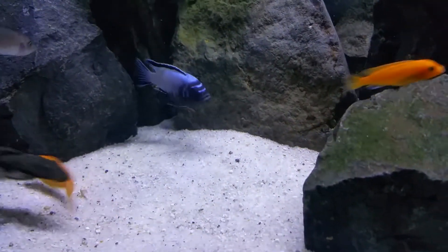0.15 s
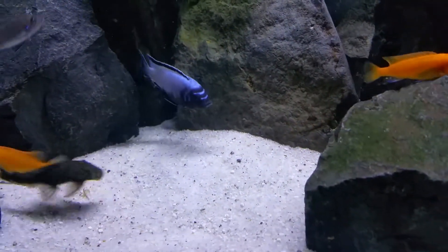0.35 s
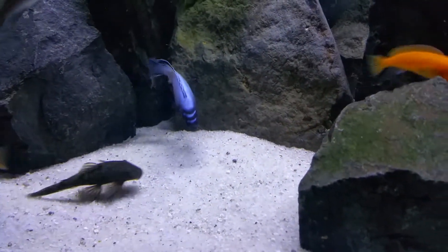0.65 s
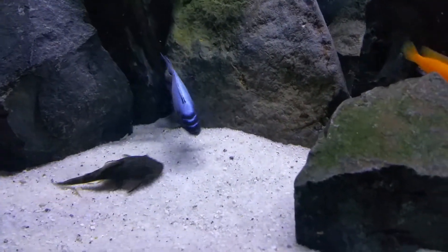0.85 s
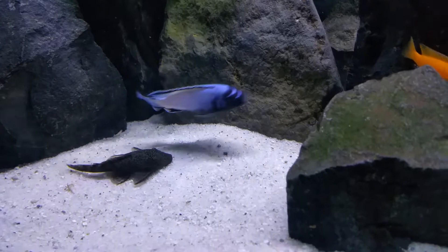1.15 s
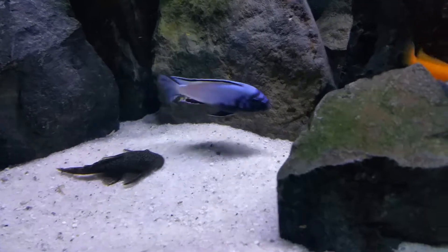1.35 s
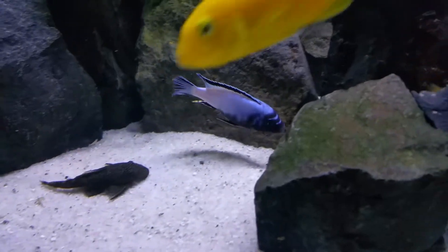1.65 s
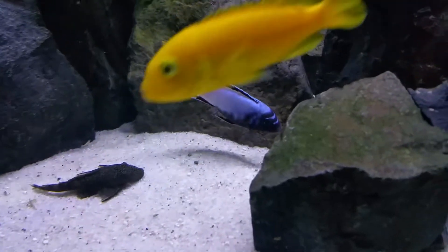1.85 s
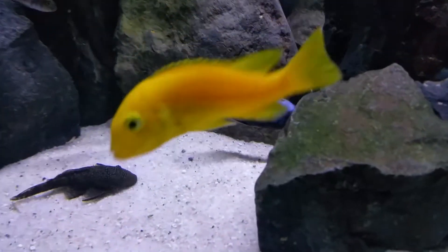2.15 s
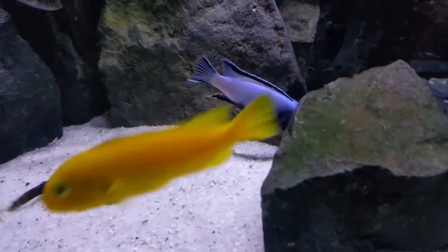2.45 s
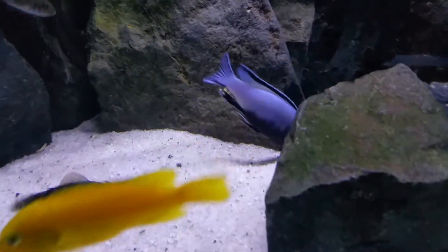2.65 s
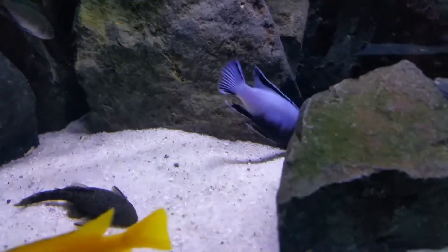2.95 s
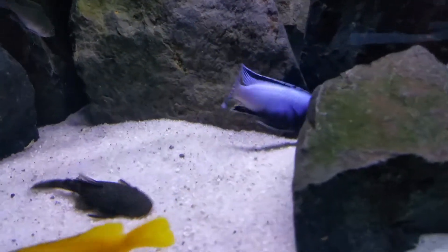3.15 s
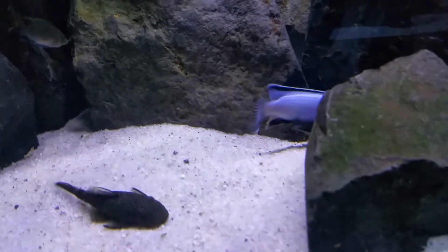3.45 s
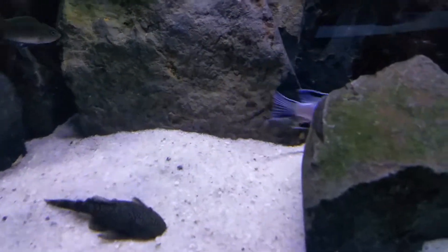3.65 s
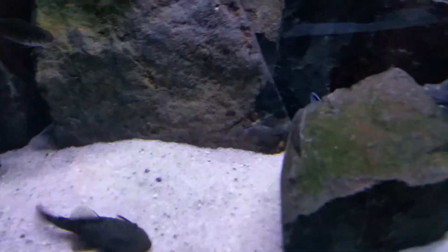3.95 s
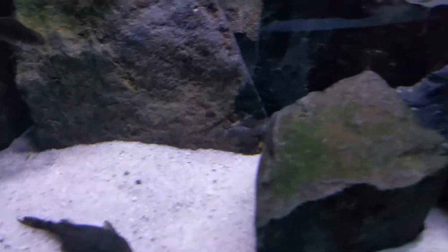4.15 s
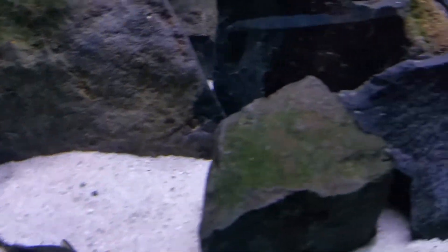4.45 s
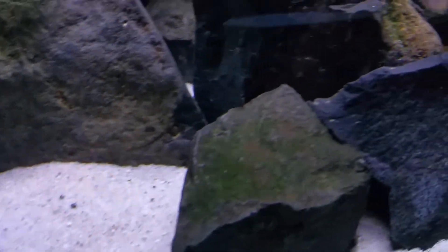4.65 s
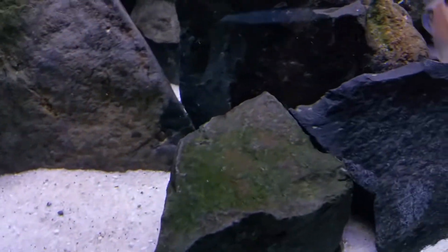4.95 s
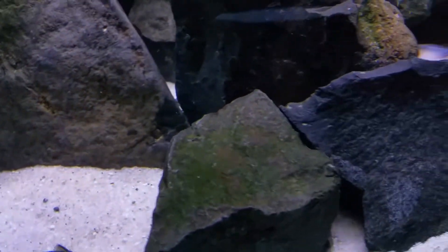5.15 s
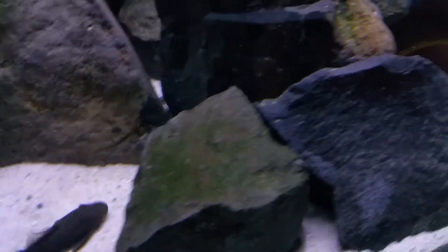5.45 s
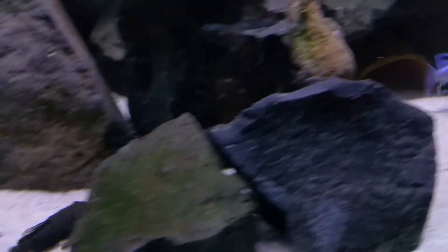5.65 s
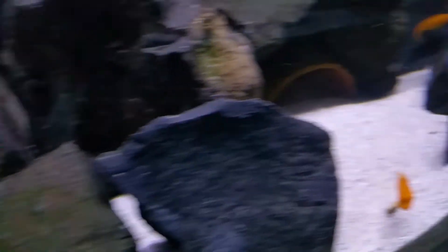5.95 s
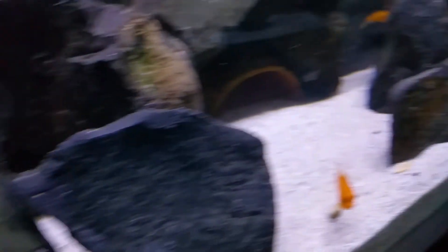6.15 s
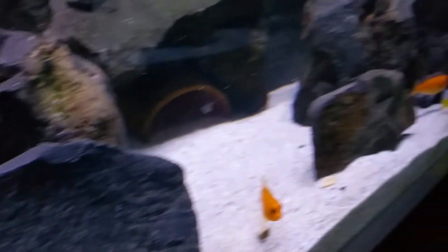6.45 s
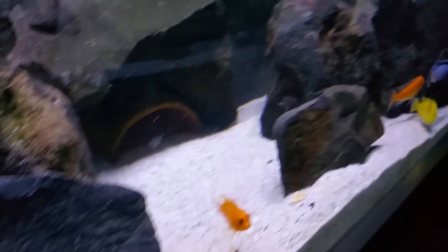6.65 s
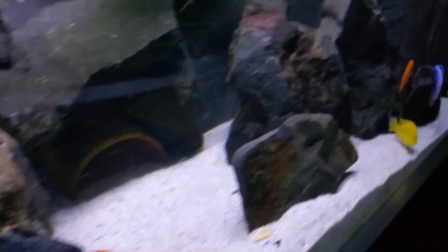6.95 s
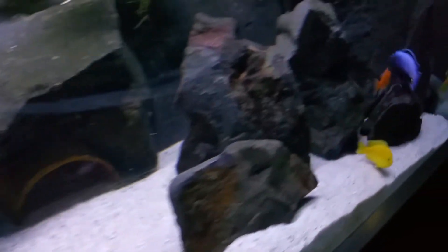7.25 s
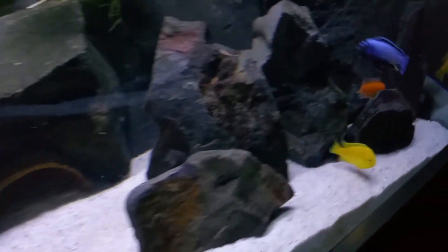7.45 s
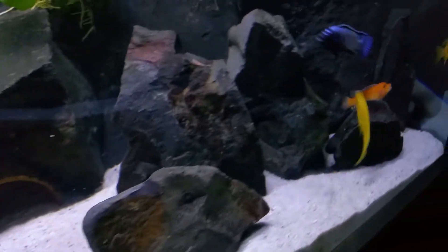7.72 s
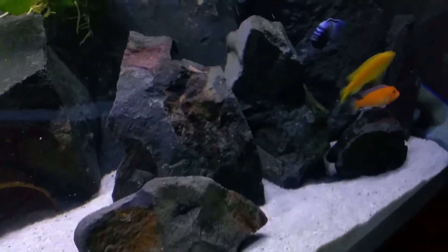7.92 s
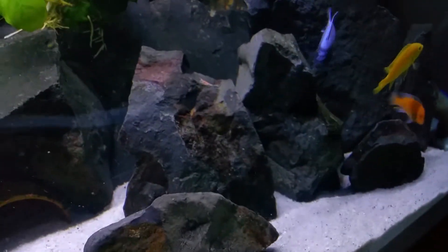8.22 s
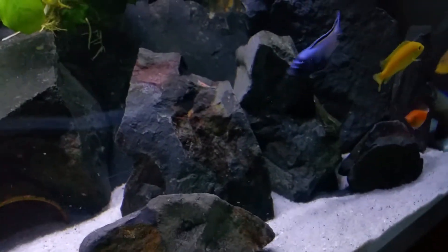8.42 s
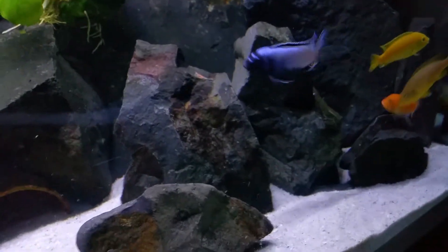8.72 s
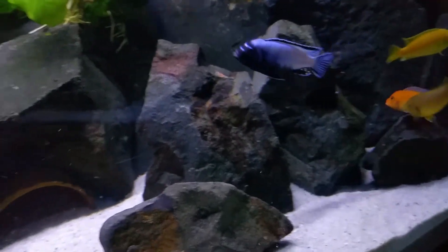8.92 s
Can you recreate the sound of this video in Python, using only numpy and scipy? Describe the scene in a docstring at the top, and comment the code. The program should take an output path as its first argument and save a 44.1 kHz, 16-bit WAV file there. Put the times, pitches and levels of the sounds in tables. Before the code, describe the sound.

An aquarium pump hums low and steady over a soft wash of water and air, with a faint fluttering whine. A quick double pop opens on the left; a stronger pair comes about two seconds in, among dry plastic ticks. More faint ticks follow around six seconds. Heard by a hand-held stereo microphone in a quiet room, with hiss, barely audible high pips and slight handling rumble at the end.

```python
"""Throughout, aquarium pumps hum on the orders of the mains and whine over a wash of water and air, and
standing waves swell and fade as a hand-held camera drifts through them. At the very start the left
microphone pops twice, and thin electronic pips set in about once a second, mostly in pairs. From 1.7 s
the plastic housing ticks as damped modes; at 2.1 s a second, stronger pair of pops steps the left
pressure. The ticks end near 6.5 s, and the rumble of the hand is strongest at the close."""
import sys
import numpy as np
from scipy import signal
from scipy.io import wavfile
from scipy.ndimage import uniform_filter1d

SR = 44100
rng = np.random.default_rng(int(sys.argv[2]) if len(sys.argv) > 2 else 0)


def dump(signal):
    """Clip the signal to [-1, 1] and save it as 16-bit WAV at the path in sys.argv[1]."""
    limited = np.clip(np.atleast_2d(signal).T, -1, 1)
    pcm = np.round(limited * 32767).astype(np.int16)
    wavfile.write(sys.argv[1], SR, pcm)


N = 400428

# All levels hold ahead of the low cut in record(); a positive balance favours the left.
MAINS_HZ = 49.975
ORDER_LAG_RAD = 0.9  # times the order squared
# Hum of the pumps: order of the mains, level/dB, left-right balance/dB
HUM_ORDERS = [(1, -74, 4), (2, -56.5, -0.5), (4, -54.5, 0.5), (5, -74, 6), (7, -74.5, 3.5),
              (8, -82.5, -13.5), (10, -85, 12), (12, -85.5, -1), (14, -79.5, 10), (17, -87, 8)]
# Place of the camera between pumps and wall: t/s, place/m
CAMERA_PLACE = [(0, -0.00068), (2.5, -0.0073), (3.9, -0.042), (4.7, -0.033), (5.3, -.014), (6.2, 0.016),
                (7.4, 0.052), (9.1, 0.062)]
# Orders that stand in the room: order, then for left and right in turn:
# level without reflection/dB, reflection (0-1), loudest place/m
STANDING_ORDERS = [(3, -48.1, 0.83, 0.545, -52.2, .64, .49), (6, -63, 0.36, -.24, -62.5, 0.59, -.28),
                   (9, -61, 0.87, -.16, -66.5, 0.73, -0.182)]
# Second motor slipping below the third order, left and right in turn:
# level without reflection/dB, reflection (0-1), loudest place/m
SLIP_HZ = 145.7  # mean
SLIP_WAVE = (-64.3, .9, -.3, -57.3, 0.5, -.5)
# Whine of the impeller, left and right in turn:
# level without reflection/dB, reflection (0-1), loudest place/m
WHINE_HZ, WHINE_FLUTTER_DB = 756.7, 2.8  # mean pitch, rms flutter
WHINE_WAVE = (-68, .75, -.068, -70.5, .6, -.078)

# Wash of water, cabinet and room, before drift and patches:
# f/Hz, density level/dB per Hz, left-right balance/dB, left-right likeness (-1 to 1)
WASH_SPECTRUM = [(20, -75.5, 4, 0.71), (57.7, -87, -5, 0.88), (115, -77, 4, 0.91), (190, -84.5, 4.5, .92),
                 (353, -89, -3, 0.74), (420, -93.5, 3.5, 0.57), (663, -92.5, 0, 0.38),
                 (776, -89, -0.5, 0.12), (896, -93.5, -2, 0.32), (1020, -90.5, 1.5, 0.27),
                 (1260, -94.5, -1, -0.34), (1890, -101, 2.5, 0.037), (1990, -99, 2, 0.33),
                 (2490, -107, 1, 0.18), (6470, -124, 18.5, 1)]
# Slow change of the wash: t/s, rumble of the hand/dB, body/dB
WASH_DRIFT = [(0, 3, -1), (2.6, 2, -1), (3.6, 6, 3), (5.4, 1, 2), (7, 7, 1), (9.1, 15, 0.5)]

# Ticks of the housing: t/s, level/dB, left-right balance/dB, tilt/dB per octave,
# thump level relative to the tick/dB, pitch as a factor on the mode frequencies
TICKS = [(1.74, -45, 9, -3, -13, 1.4), (2.192, -34, 5.5, -2, -4, 1.07), (2.4347, -30.5, 4, -3.5, -16, 1.14),
         (3.1497, -34, 5, 0.7, -17, 1.01), (3.3394, -37, 8, -1.5, -10, 1.07), (3.702, -47, 9, -2, -14, 1.2),
         (5.967, -42, 9, -3, -9, 1.25), (6.142, -49, 8, -2, -12, 1.3), (6.328, -50, 8, -4, -20, 1.3),
         (6.424, -41.5, 12, -3, -11, 1.4), (6.5379, -41, -18, -7, -4, 1.1), (6.5486, -42, 7, -1, -26, 0.84)]
# Modes of the housing, before pitch, detuning and damping factors: f/Hz, level/dB, 60 dB decay time/s
HOUSING_MODES = [(1330, 5, 0.0057), (2380, -5, 0.0054), (3530, -4, 0.0032), (4980, -6.5, .003),
                 (5970, -9, .004), (7860, -8, 0.003), (10500, -13, 0.0024), (14000, -22, .0015)]
# Thump under each tick: f/Hz, 60 dB decay time/s
THUMP = (186, 0.052)
STIFFNESS = 1.44  # exponent: higher ticks ring shorter

# Pops: t/s, left step (full scale = 1, ahead of the low cut), rise time/s,
# right crackle level relative to the step/dB
POPS = [(0.0184, 0.2, .00016, -60), (0.0236, 0.32, .00019, -60), (2.1409, 0.68, .000177, -34),
        (2.1514, 0.31, .00022, -60)]
LEFT_CRACKLE_DB = -27  # relative to the step

# Pips of the camera electronics; beat 0 lies one period before PIP_BEAT_1_S
PIP_BEAT_1_S, PIP_EVERY_S, PIP_PAIR_S, PIP_LENGTH_S, PIP_EXTRA_S = 0.743, 1.004, 0.3, 0.09, 8.33
PIP_HZ, PIP_LEFT_DB = 11115, -86  # mean pitch, level
# Beats without a partner: beat number, counted from 0
PIP_ALONE = [6, 7, 9]

# Hiss of the two microphones: f/Hz, left density level/dB per Hz, right density level/dB per Hz
HISS_SPECTRUM = [(1000, -112, -112), (3600, -112, -113), (4400, -106, -111), (5600, -103.5, -114),
                 (5830, -111, -115), (8200, -110, -116), (10100, -113, -115), (12500, -114, -114),
                 (16300, -115, -115)]
# Thin continuous tone of the camera electronics: mean f/Hz, left level/dB, right level/dB
ELECTRONIC_TONE = (9090, -92, -106)

LOW_CUT_HZ, LOW_CUT_Q, EDGE_HZ = 97, 0.77, 15750
OFFSET = -0.0005  # full scale = 1


def hum(t):
    """Harmonic series of the mains with an interaural-style delay, and beating with a slipping motor."""
    late_s = np.array([[0], [0.00015]])  # the right microphone hears the orders later
    partials = []
    for order, db, pan_db in HUM_ORDERS:
        partials.append((order, sides(db + 0.31 * wander(t, 1.53), pan_db)))
    for order, *wave in STANDING_ORDERS:
        partials.append((order, standing(t, order * MAINS_HZ, wave)))

    out = np.zeros((2, N))
    for order, gain in partials:
        phase = 2 * np.pi * order * MAINS_HZ * (t - late_s) + ORDER_LAG_RAD * order ** 2
        out += gain * np.sin(phase)

    slip_turns = np.cumsum(SLIP_HZ + 0.17 * wander(t, 1.97)) / SR + rng.random()
    slip_gain = standing(t, SLIP_HZ, SLIP_WAVE) * amp(1.0 * wander(t, 2.5))
    out += slip_gain * np.sin(2 * np.pi * slip_turns)
    return np.sqrt(2) * out  # rms to peak


def whine(t):
    """Frequency and amplitude modulation: an impeller tone flutters in pitch and strength."""
    turns = np.cumsum(WHINE_HZ + 2.8 * wander(t, 9, octaves=4)) / SR
    flutter = amp(WHINE_FLUTTER_DB * wander(t, 16, octaves=2))
    tone = np.sin(2 * np.pi * (turns - [[0], [0.1]]))  # right lags a tenth of a turn
    return np.sqrt(2) * standing(t, WHINE_HZ, WHINE_WAVE) * flutter * tone


def standing(t, hz, wave):
    """Interference: direct and reflected waves add or cancel according to the place of the camera."""
    db, reflection, loudest_m = np.reshape(wave, (2, 3, 1)).transpose(1, 0, 2)
    place_m = over_time(CAMERA_PLACE, t)[0]
    turns = 2 * hz * (place_m - loudest_m) / 343  # speed of sound in m/s
    return amp(db) * abs(1 + np.clip(reflection, 0, 0.95) * np.exp(2j * np.pi * turns))


def wash(size=2048):
    """Filtered random noise: the hand moves the lowest band, the place in the room the middle."""
    hz = np.fft.rfftfreq(size, 1 / SR)
    frames = 4 * N // size + 5
    db, pan_db, likeness = over_hz(WASH_SPECTRUM, hz)
    rumble_db, body_db = over_time(WASH_DRIFT, np.arange(frames) * size / 4 / SR)

    low = 1 / (1 + (hz[:, None] / 55) ** 4)
    middle = np.exp(-np.log((hz[:, None] + 1) / 400) ** 2 / 0.39)

    # random level patches, smoothed along time, then along frequency
    patches = uniform_filter1d(rng.standard_normal((frames, len(hz))), 8, 0)
    patches = uniform_filter1d(patches, 12, 1).T
    db = db + low * rumble_db + middle * body_db + 1.47 * patches / patches.std()
    return noise(sides(db, pan_db), likeness, size)


def ticks():
    """Modal decay: a crack rings the housing, damped sooner on the right, over a longer low thump."""
    t, out = np.arange(3000) / SR, np.zeros((2, N))
    detune = rng.uniform(0.86, 1.06, (len(TICKS), len(HOUSING_MODES)))
    right_sooner = np.array([[1], [0.55]])
    thump_hz, thump_t60 = THUMP
    for (s, db, pan_db, slope_db, thump_db, pitch), shifts in zip(TICKS, detune):
        ring = pitch ** -STIFFNESS
        tick = np.zeros((2, len(t)))
        for (hz, mode_db, t60), shift in zip(HOUSING_MODES, pitch * shifts):
            rise = 1 - np.exp(-(t * hz / 0.49) ** 2)  # the treble speaks first
            tilt_db = slope_db * np.log2(hz / HOUSING_MODES[0][0])
            decay = amp(mode_db + tilt_db - 60 * t / (t60 * ring * right_sooner))
            tick -= rise * decay * np.sin(2 * np.pi * hz * shift * t)
        tick -= amp(thump_db - 60 * t / thump_t60) * np.sin(2 * np.pi * thump_hz * t)
        at = round(s * SR)
        out[:, at:at + len(t)] += sides(db, pan_db)[:, None] * tick
    return out


def pops(t):
    """Step excitation: the left level jumps and stays until the low cut, while the edge crackles."""
    out, grit = np.zeros((2, N)), rng.standard_normal((2, N))
    for s, step, rise_s, right_db in POPS:
        out[0] += step * np.clip((t - s) / rise_s, 0, 1)
        burst = (t >= s) * np.exp(-np.maximum(t - s, 0) / 0.0005)
        out += step * amp([[LEFT_CRACKLE_DB], [right_db]]) * burst * grit
    return out


def pips(t):
    """Gated tone: brief, slightly unsteady sines with soft edges, mostly in pairs."""
    beats = PIP_BEAT_1_S + PIP_EVERY_S * np.arange(-1, 9)
    partners = np.delete(beats + PIP_PAIR_S, PIP_ALONE)
    starts = [*beats, *partners, PIP_EXTRA_S]
    gate = sum(np.clip(np.minimum(t - s, s + PIP_LENGTH_S - t) / 0.0091, 0, 1) for s in starts)
    turns = np.cumsum(PIP_HZ + 15 * wander(t, 30)) / SR
    gain = amp([[PIP_LEFT_DB], [PIP_LEFT_DB - 6]])
    return np.sqrt(2) * gate * np.sin(2 * np.pi * turns) * gain


def hiss(t, size=512):
    """Incoherent noise: the channels hiss independently; a thin tone of wavering pitch is common."""
    spectrum = amp(over_hz(HISS_SPECTRUM, np.fft.rfftfreq(size, 1 / SR)))
    magnitude = spectrum * np.ones(4 * N // size + 5)
    tone_hz, *tone_db = ELECTRONIC_TONE
    turns = np.cumsum(tone_hz + 1.44 * wander(t, 3)) / SR
    tone = amp(tone_db)[:, None] * np.sin(2 * np.pi * turns)
    return noise(magnitude, 0, size) + np.sqrt(2) * tone


def noise(magnitude, likeness, size):
    """Partial coherence: two-channel noise from short-time magnitudes in root power per hertz."""
    a, b, c, d = rng.standard_normal((magnitude.shape[2], magnitude.shape[1], 4)).T
    likeness = np.clip(likeness, -1, 1)
    left = a + 1j * b
    right = likeness * left + np.sqrt(1 - likeness ** 2) * (c + 1j * d)
    bins = np.array([left, right]) * magnitude * np.sqrt(SR / size)
    return signal.istft(bins, nperseg=size, noverlap=size * 3 // 4)[1][:, :N]


def wander(t, top_hz, octaves=5):
    """Superposition: slow sines of random phase add to an irregular curve of rms about 1."""
    hz = np.geomspace(top_hz / 2 ** octaves, top_hz, 20)[:, None]
    coarse_t = t[::256]
    sines = np.sin(2 * np.pi * (hz * coarse_t + rng.random(hz.shape)))
    curve = (sines / np.sqrt(hz)).sum(0)
    return np.interp(t, coarse_t, curve / curve.std())


def amp(db):
    """Logarithmic level: decibels to amplitude gain."""
    return 10 ** (np.asarray(db) / 20)


def sides(db, pan_db):
    """Level difference: left and right gain from a level and a balance."""
    return amp([db + pan_db / 2, db - pan_db / 2])


def over_time(rows, t):
    """Linear interpolation: columns of a curve table at the times t."""
    s, *columns = np.transpose(rows)
    return [np.interp(t, s, c) for c in columns]


def over_hz(rows, hz):
    """Logarithmic frequency: columns of a spectrum table interpolated over log(f + 1)."""
    f, *columns = np.transpose(rows)
    return [np.interp(np.log(hz + 1), np.log(f + 1), c)[:, None] for c in columns]


def scene():
    """Linear superposition of all sources at the two microphones."""
    t = np.arange(N) / SR
    return hum(t) + whine(t) + wash() + ticks() + pops(t) + pips(t) + hiss(t)


def record(dry):
    """Linear filtering: a resonant low cut makes steps undershoot; a converter offset and band limit follow."""
    w = 2 * np.pi * LOW_CUT_HZ
    low_cut = signal.bilinear([1, 0, 0], [1, w / LOW_CUT_Q, w * w], SR)
    cut = signal.lfilter(*low_cut, dry) + OFFSET
    band_limit = signal.firwin(511, EDGE_HZ, window=("kaiser", 5), fs=SR)
    return signal.oaconvolve(cut, band_limit[None], "same", axes=1)


dry = scene()
out = record(dry)
dump(out)
```